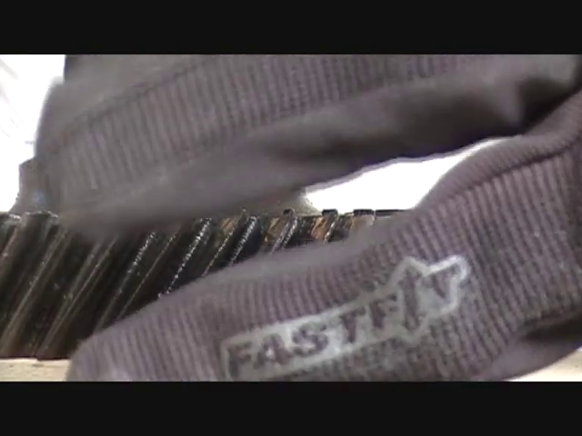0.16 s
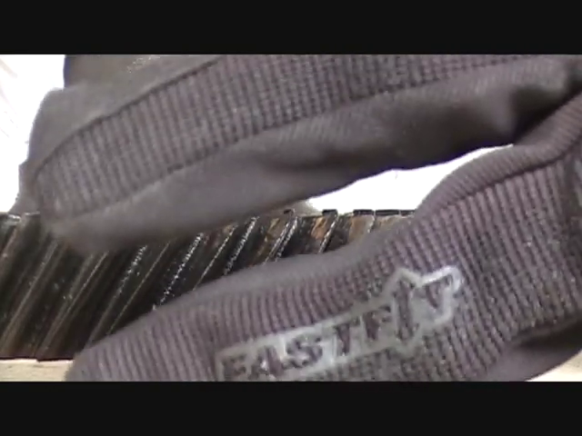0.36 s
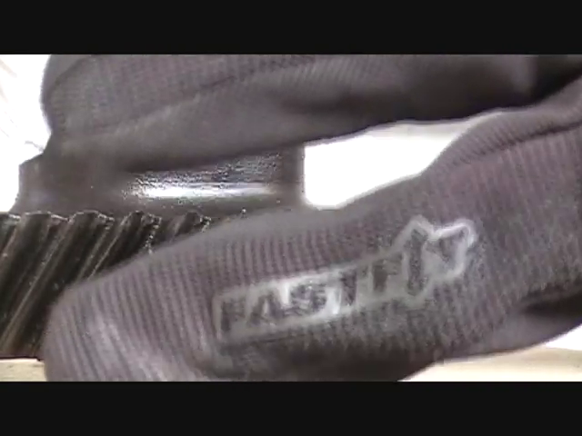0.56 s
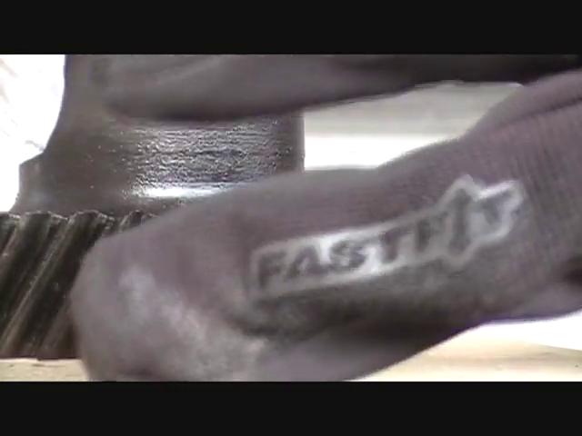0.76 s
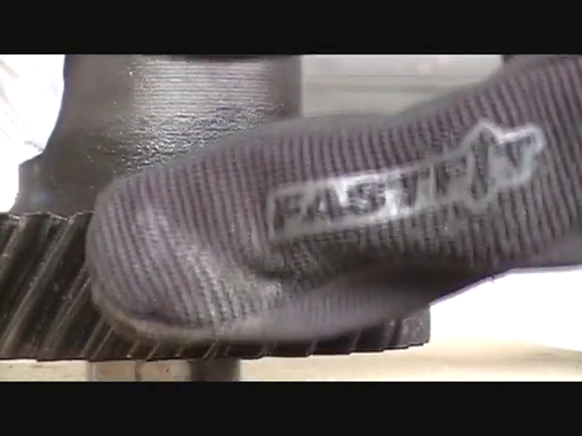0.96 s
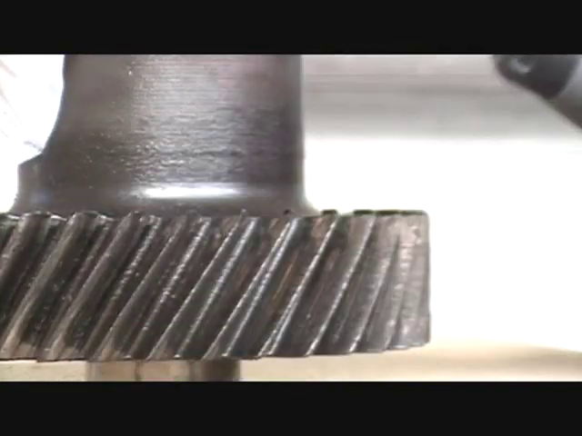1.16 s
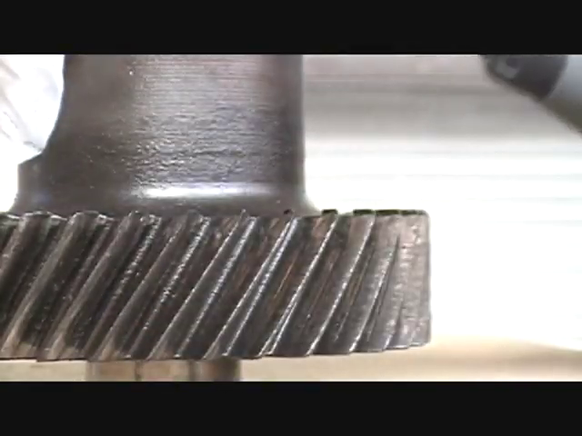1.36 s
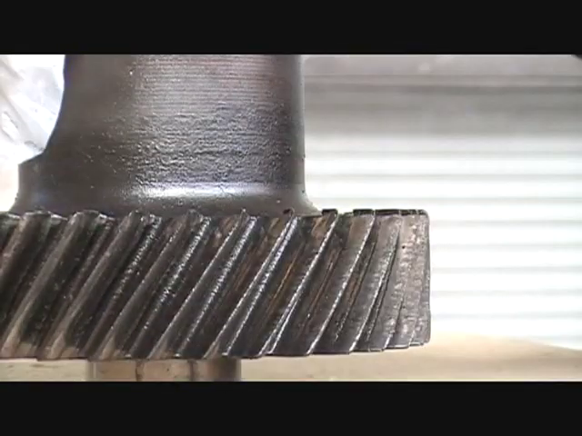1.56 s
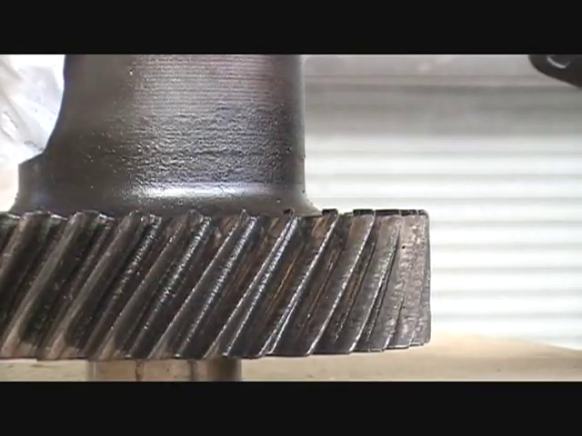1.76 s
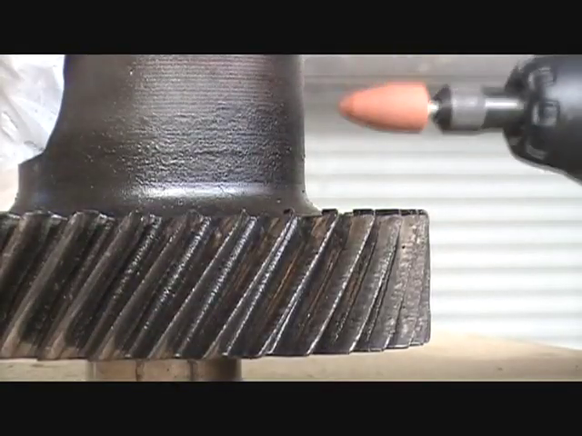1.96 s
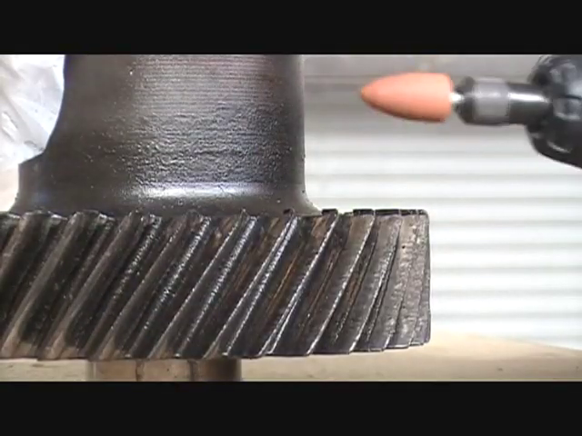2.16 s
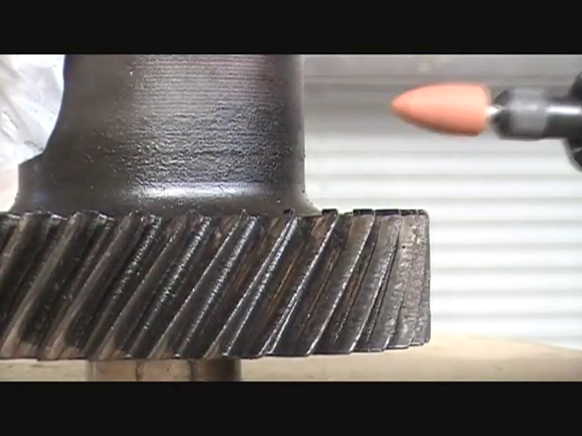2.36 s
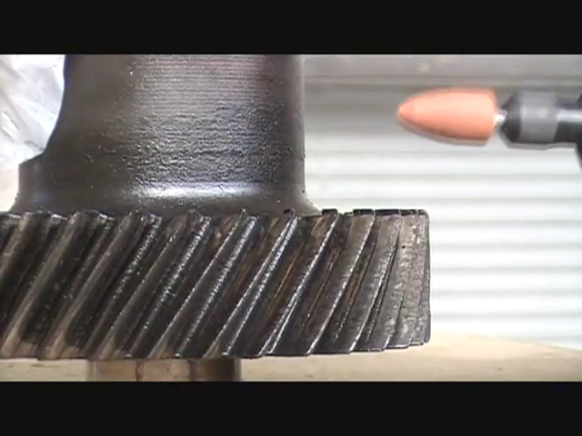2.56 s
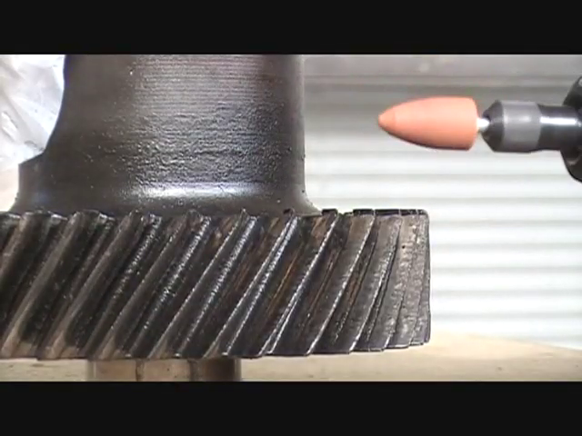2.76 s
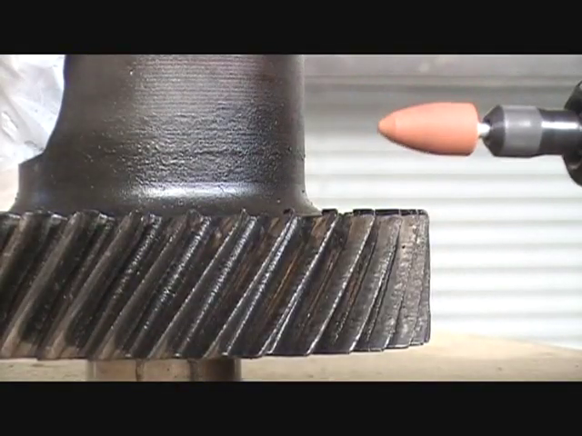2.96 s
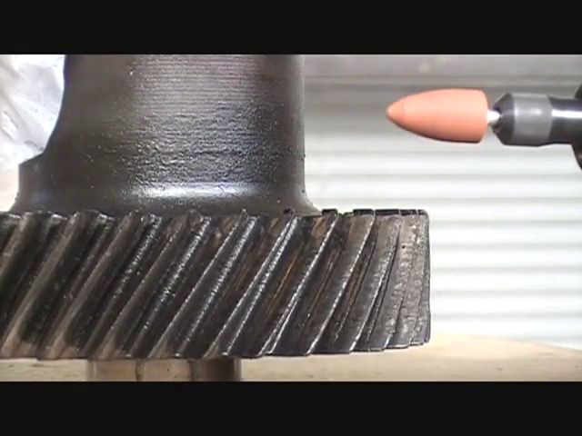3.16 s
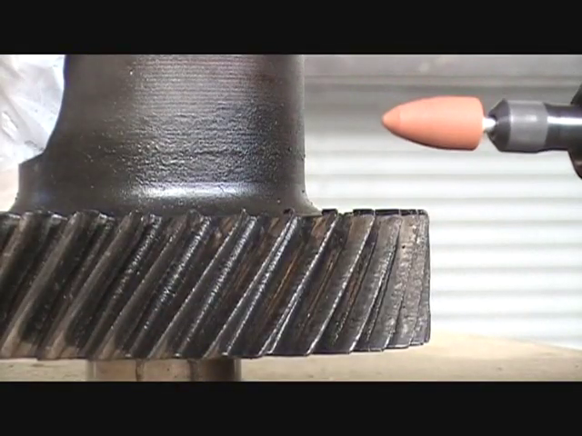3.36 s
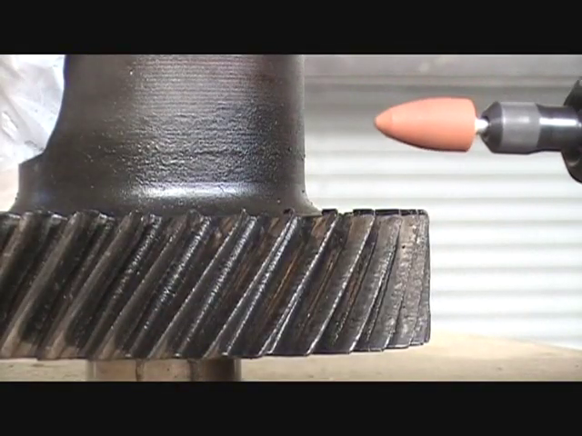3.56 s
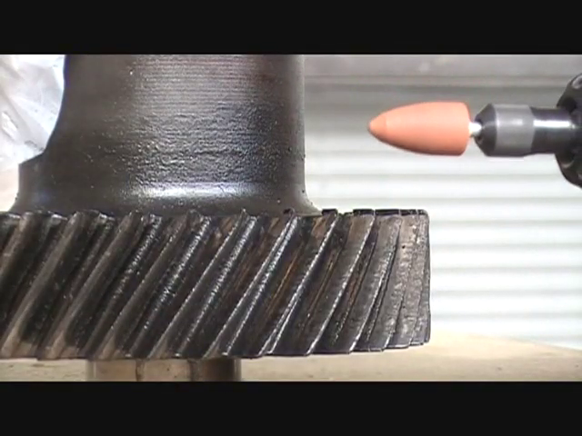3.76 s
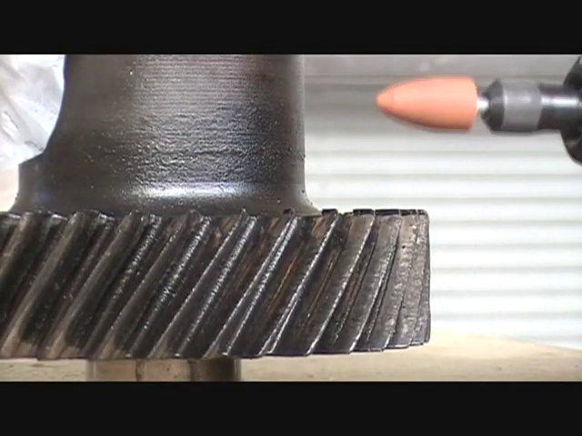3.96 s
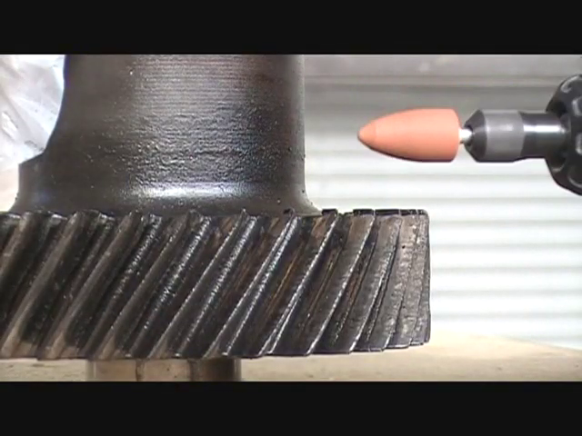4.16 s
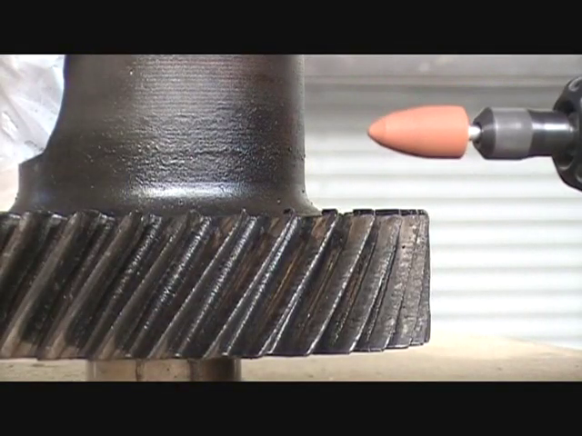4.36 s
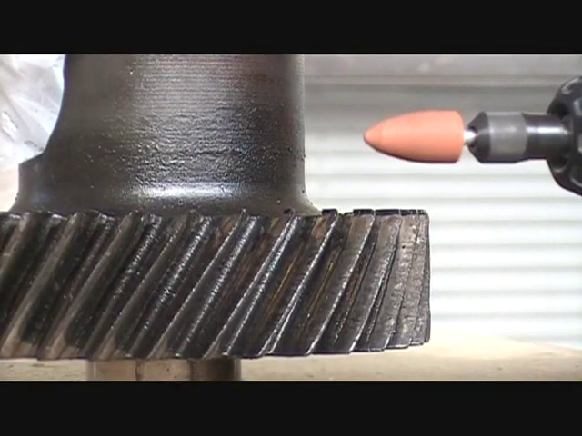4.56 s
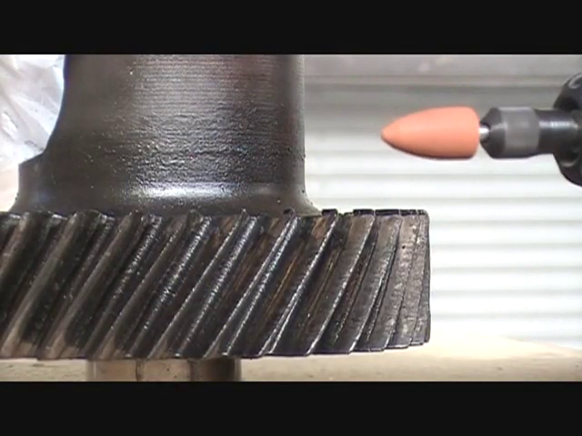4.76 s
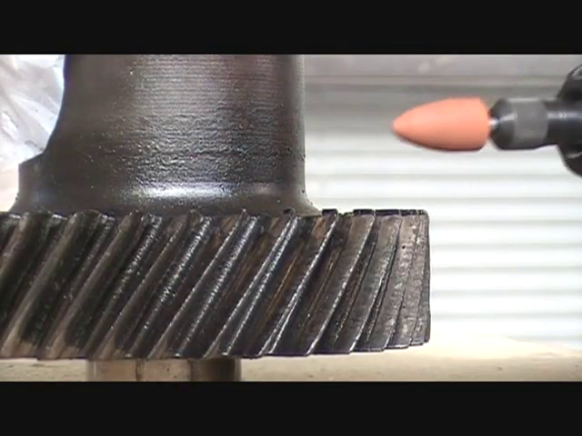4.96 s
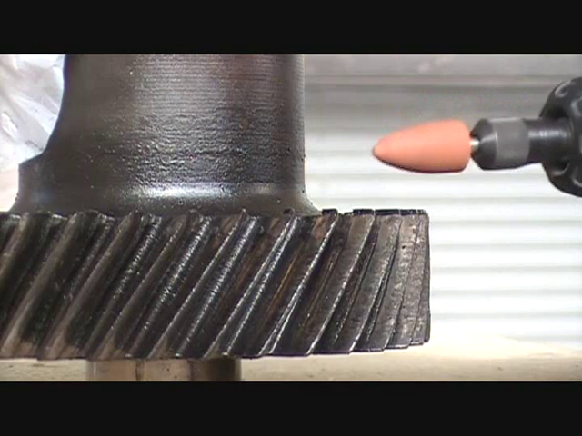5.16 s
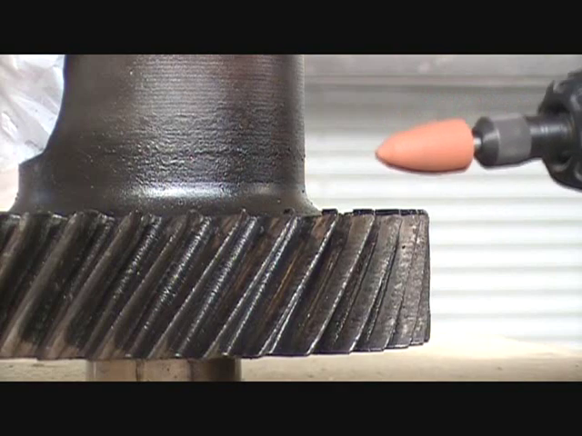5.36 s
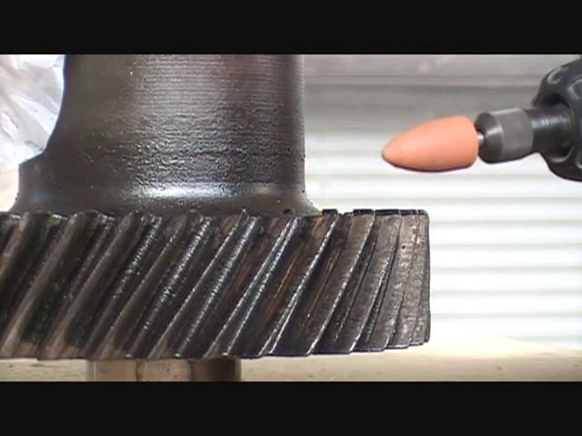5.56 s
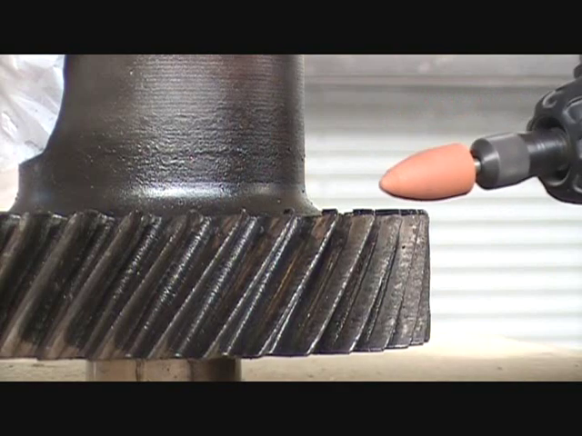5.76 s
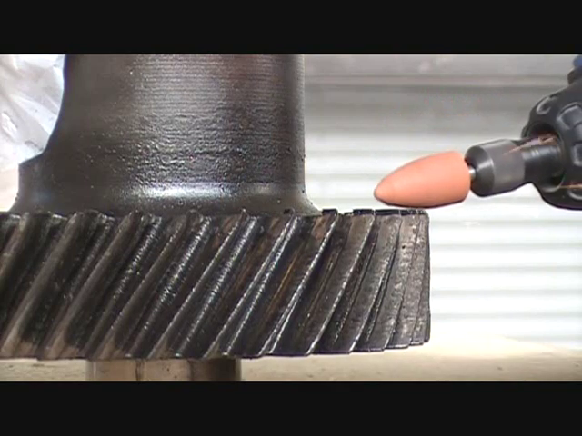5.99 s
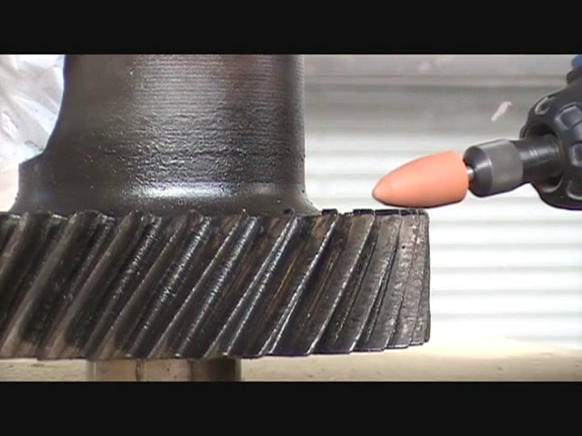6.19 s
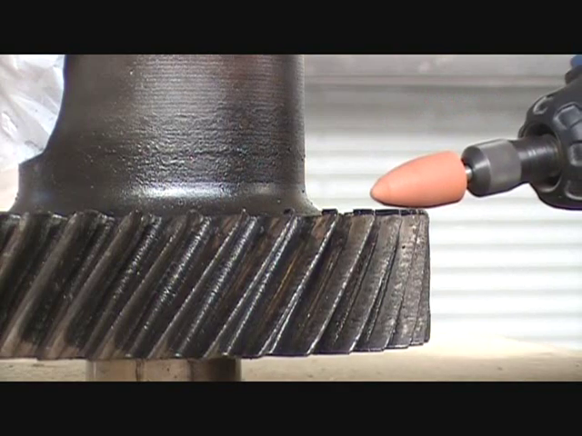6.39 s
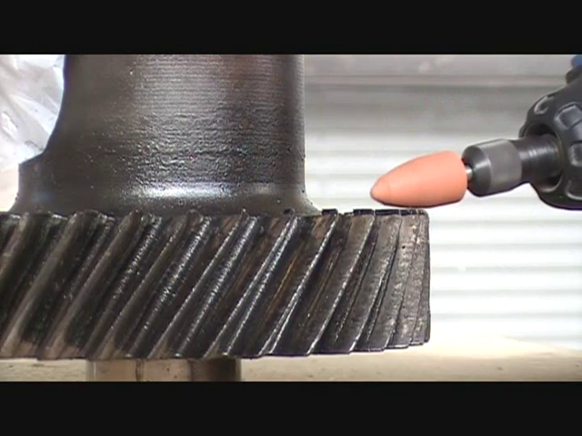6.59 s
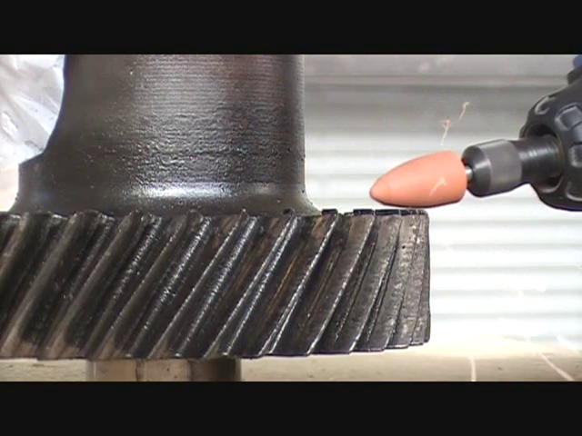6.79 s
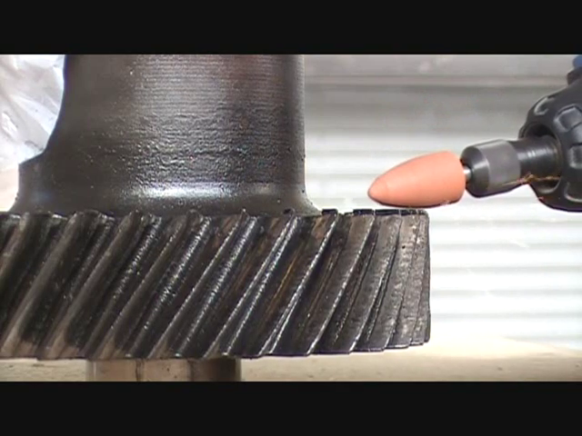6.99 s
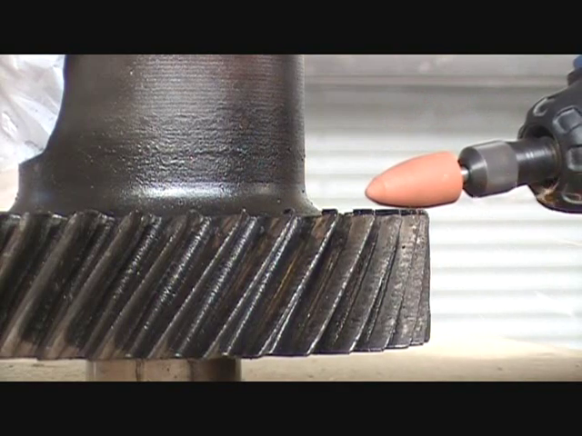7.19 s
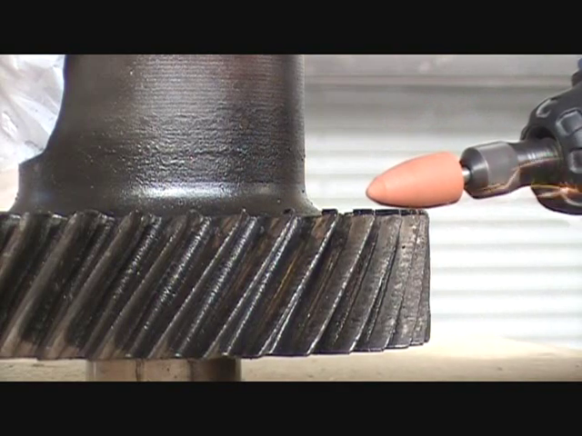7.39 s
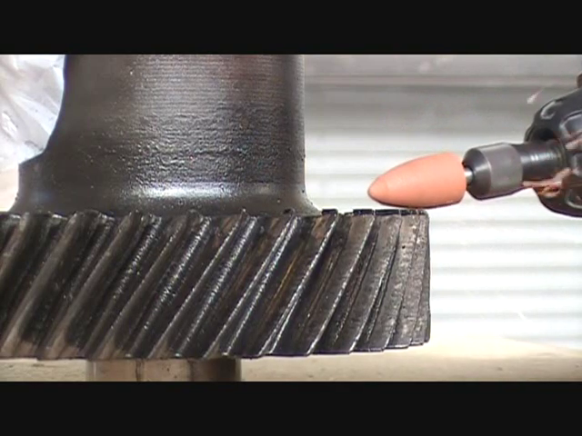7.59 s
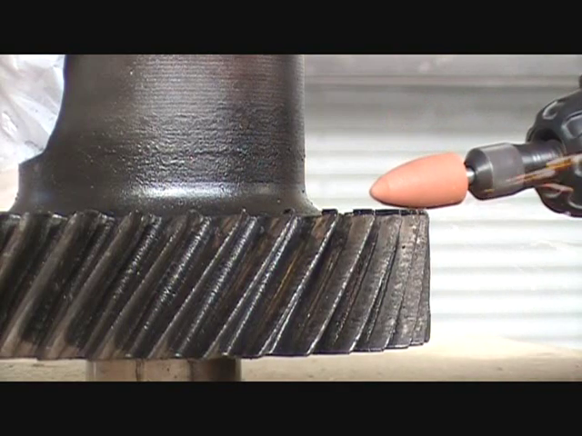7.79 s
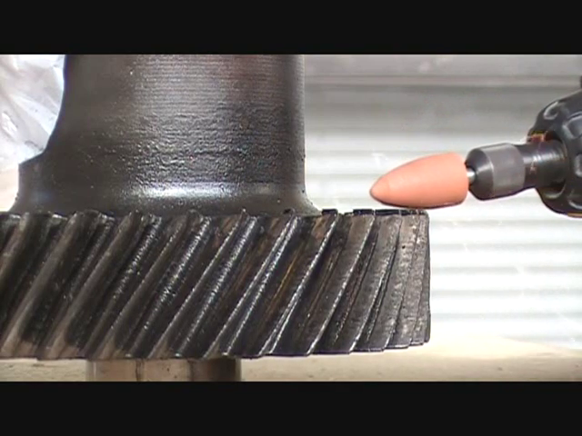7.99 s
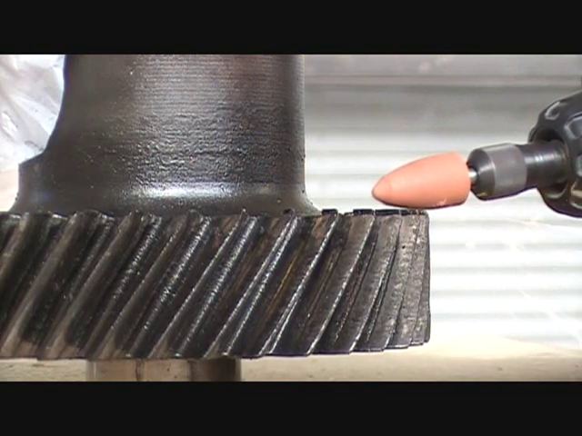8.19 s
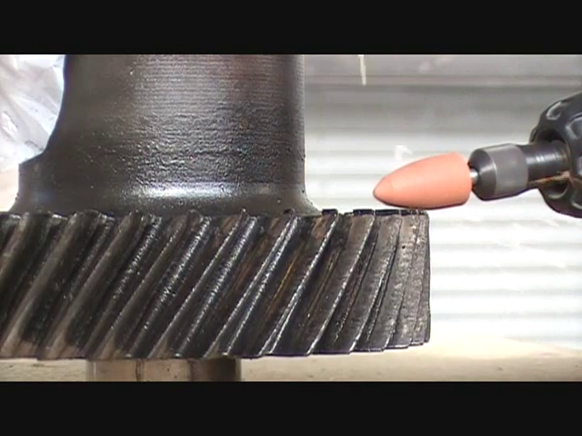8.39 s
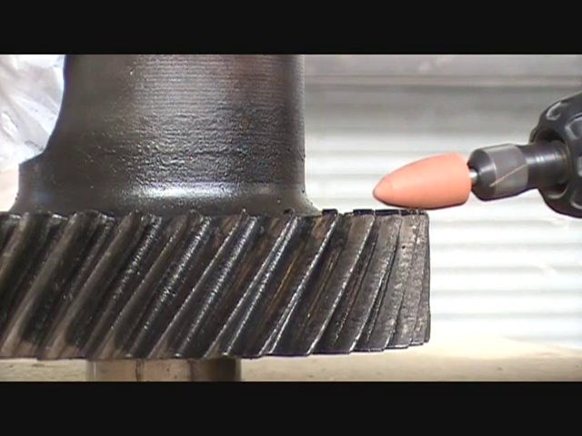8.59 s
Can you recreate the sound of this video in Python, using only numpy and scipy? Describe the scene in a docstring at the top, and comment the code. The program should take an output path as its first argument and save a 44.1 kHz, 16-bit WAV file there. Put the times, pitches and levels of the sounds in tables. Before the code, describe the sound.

After quiet workshop hum and faint chirps, a small rotary tool spins up close by, rushing with air, then grinds gritty steel teeth.

```python
"""A rotary tool, held close to the microphone, is switched on and spins up to about 30000 rpm.
Its shaft harmonics whine and its fan rushes, pulsed by the mains; its exhaust buffets the microphone.
From 6 s its stone touches the teeth of a steel gear: it strikes once a turn, grit scrapes,
the gear rings and squeals, and the motor slows a little.
Around it lies a humming workshop, with faint high chirps before and just as the motor starts."""
import sys
import numpy as np
from scipy import signal
from scipy.fft import rfft, irfft
from scipy.io import wavfile
from scipy.ndimage import uniform_filter1d

SR = 44100
rng = np.random.default_rng(int(sys.argv[2]) if len(sys.argv) > 2 else 0)


def int16_out(signal):
    """Quantize to a 16-bit WAV file."""
    q = np.round(np.clip(np.atleast_2d(signal).T, -1, 1) * 32767)
    wavfile.write(sys.argv[1], SR, q.astype(np.int16))


N = 381024
TIME = np.arange(N) / SR
MAINS_HZ = 120  # rate of the mains half-waves that pulse the motor
TOP_HZ = 15200  # upper limit of the recorded band

# spectrum of the workshop noise: (frequency [Hz], relative level [dB])
WORKSHOP_COLOUR = [(20, -34), (60, -15), (100, -11), (190, -11.5), (280, -8), (480, -10), (700, -12.5),
                   (950, -12), (1700, -12), (2500, -14.5), (4500, -16), (9150, -26), (13900, -50),
                   (15000, -65)]
# hum of the workshop before the motor runs: (frequency [Hz], level [dB])
WORKSHOP_HUM = [(57.5, -46), (118.4, -50), (274.5, -57.5)]
# the background sinks once the motor runs: (time [s], level [dB])
WORKSHOP_LEVEL = [(0, -34.5), (1.35, -33.5), (1.9, -44), (2.8, -45.5), (5, -45.5), (8.64, -47)]
# a low hum that swells near the gear: (time [s], hold [s], level [dB])
HUM_SWELLS = [(5.1, 0.36, -50), (5.75, .35, -48.5)]
# the two capsules differ most near their own resonance: (frequency [Hz], side gain [dB])
CAPSULE_DIFFERENCE = [(200, -5.5), (600, -2), (2400, -1.5), (5000, -0.5), (6500, 0.5), (8500, 6.5),
                      (11000, 14.5), (14000, 2)]
# faint high chirps: (time [s], frequency [Hz], width [Hz], length [s], level [dB])
CHIRPS = [(0.026, 4200, 900, .1, -39), (.26, 4150, 600, .08, -40), (.54, 3850, 450, .07, -41),
          (0.618, 3470, 280, 0.088, -34), (0.673, 3100, 450, .08, -33.5), (0.8, 3550, 240, .05, -32),
          (0.834, 3960, 450, 0.049, -34), (.86, 3160, 450, .07, -35), (0.99, 4400, 600, .08, -35.5),
          (1.013, 3650, 550, .07, -38), (1.153, 3940, 1100, 0.075, -33), (1.265, 3980, 550, 0.12, -36.5)]

# spectrum of the gusts' rumble: (frequency [Hz], relative level [dB])
DRAUGHT_COLOUR = [(20, -20), (45, -4), (120, -1.5), (220, -7), (400, -16), (900, -40)]
# gusts of exhaust on the microphone, over one long weak one: (time [s], hold [s], level [dB])
GUSTS = [(3.335, .005, -41), (3.4, 1.3, -50), (3.485, .01, -42), (3.64, .03, -40), (3.79, .04, -41),
         (3.878, .02, -35), (4.05, 0.055, -43), (4.25, 0.084, -43.5), (4.41, .02, -40), (4.686, .01, -45)]
GUST_ATTACK_S, GUST_RELEASE_S = .035, 0.057

# a short dull scuff, and its spectrum: (frequency [Hz], relative level [dB])
SCUFF_S, SCUFF_HOLD_S, SCUFF_DB = 8.515, 0.037, -23.5
SCUFF_COLOUR = [(60, -24), (350, -0.5), (900, 0), (2000, -2), (4000, -8), (12000, -37)]
# sharp clicks of the switch and first sparks at the brushes: (time [s], relative level [dB])
CLICKS = [(1.1796, -12), (1.2327, -14), (1.3355, -11.5), (1.341, -8), (1.360, -12), (1.375, -13),
          (1.391, -15)]
# spectrum of the clicks: (frequency [Hz], relative level [dB])
CLICK_COLOUR = [(300, -31), (1500, -6), (3500, -5), (5200, -5), (7500, 1.5), (10000, -13), (15000, -38)]

# modes of the steel gear: (frequency [Hz], time to fall 60 dB [s], relative level [dB])
GEAR_MODES = [(1626, 0.17, -4.5), (3070, .15, -4), (3606, 0.39, 5), (3810, .15, 8), (4600, 0.08, -8),
              (5370, .1, -11), (5500, .25, -6), (6950, .08, -6), (8640, 0.73, 2), (10300, .08, -4),
              (11700, .25, -6), (13507, .3, -19)]
# spectra of the stone's knock and of its scrape: (frequency [Hz], relative level [dB])
KNOCK_COLOUR = [(40, -59), (400, -22.5), (1300, -17.5), (1950, -3.5), (2450, -19.5), (3000, 2.0),
                (3700, -5.0), (5200, 0), (6200, -16.0), (7300, -2.5), (9000, -16), (11000, -18), (15000, -53)]
SCRAPE_COLOUR = [(40, -54), (400, -14.5), (1700, -3), (2400, -26), (3500, 0), (7000, -1),
                 (10000, -9), (14000, -34)]
# the stone rests on the teeth from this moment, with this level and bounce (0-1)
TOUCH_S, TOUCH_DB, TOUCH_BOUNCE = 6.03, -32, .35
# pushes of the hand: (time [s], hold [s], level [dB], bounce on every second turn [0-1])
PUSHES = [(6.05, .05, -30, 0.5), (6.874, 0.15, -26.5, .5), (7.142, 0.028, -22.5, 0),
          (7.36, 0.043, -25.5, .1), (7.7, 0.26, -27.5, .1), (8.207, .03, -25.5, .7),
          (8.38, 0.14, -28.5, .45)]
PUSH_ATTACK_S, PUSH_RELEASE_S = 0.086, 0.16
TOOTH_HZ, RIM_HZ, FACE_HZ, EDGE_HZ = 13307, 3648, 8627, 11650
# modes of the gear that squeal under the stone: (time [s], hold [s], frequency [Hz], level [dB])
SQUEALS = [(6.06, .2, TOOTH_HZ, -35), (6.3, .38, TOOTH_HZ, -32.5), (6.98, 0.23, FACE_HZ, -33),
           (7.158, .05, TOOTH_HZ, -26.5), (7.97, .22, TOOTH_HZ, -39), (8.14, .06, RIM_HZ, -29.5),
           (8.15, .2, FACE_HZ, -37), (8.26, .13, EDGE_HZ, -41), (8.35, .08, TOOTH_HZ, -33),
           (8.6, .04, TOOTH_HZ, -33)]
SQUEAL_ATTACK_S, SQUEAL_RELEASE_S = 0.05, 0.25

# how the hand holds the tool: (time [s], pose [0 back, 1 level, 2 tilted, 3 pressed on the gear])
POSE = [(1.8, 1), (2.05, 0), (2.35, 0), (2.8, 1), (4.2, 1), (5.05, 2), (5.9, 2), (6.55, 2.5), (7.0, 3)]
# reaching the microphone in each pose, back to pressed: (whine [dB], rush of the vents [dB], hiss [dB])
POSE_LEVELS = [(-19.5, -27, -22.5), (-19, -27, -23), (-19.5, -29.5, -22), (-22, -32, -24)]
# the hand sways the tool nearer to the microphone and away: (time [s], level [dB])
NEARNESS = [(1.7, 0), (2.3, 0.4), (2.9, 0), (3.15, -1.3), (3.6, 0.5), (3.95, -0.8), (4.27, 1.1),
            (4.6, 0.44), (5.8, 0.45), (6.3, -.5), (6.65, 0.5), (7.08, -1.1), (7.8, 0), (8.6, 0.5)]
# the motor nears its free speed [turns/s] in a quick and a slow stage
START_S, FREE_HZ, QUICK_SHARE, QUICK_S, SLOW_S = 1.3526, 504.6, .4935, .0966, .37
# lost to drag and to the load on the stone: (time [s], speed loss [turns/s])
SPEED_LOSS = [(2.9, 0), (3.7, 3.3), (4.0, 3.7), (4.4, 5.3), (5.3, 5.4), (6.7, 8.8), (7.25, 12.6), (8.6, 21)]
STRAIN_SLIP = 0.31  # this share below its free speed the motor draws its full starting current
PULSE_IDLE, PULSE_STRAIN = 0.21, 0.38  # depth of the mains pulsing, and what full current adds

# spectrum of the cooling air: (frequency [Hz], relative level [dB])
AIR_COLOUR = [(100, -25.5), (300, -16), (650, -13), (850, -6.5), (1150, -2), (1750, 1), (2400, -5.5),
              (4000, -5.5), (5500, -1), (7300, 0.5), (9300, -6.5), (11000, -14), (13500, -18.5),
              (15000, -35.5)]
HISS_FLICKER_DB = .6
AIR_FULL_HZ, HISS_FULL_HZ = 110, 296  # turns/s at which the tool's fade-in and the hiss are complete
COMMUTATOR_BARS, FAN_BLADES = 8, 18
# housing resonances that the commutator tones sweep through: (frequency [Hz], width [Hz], level [dB])
HOUSING = [(1620, 240, -20), (2660, 550, -18), (3136, 260, -19.5), (3550, 160, -24), (4380, 360, -21),
           (5900, 650, -25.5)]
# the commutator tones grow with this power of the speed, up to this speed [turns/s]
BRUSH_FULL_HZ, BRUSH_POWER = 195, 4

# balance of the shaft harmonics in each pose: (multiple of shaft speed, relative level [dB])
HARMONICS_BACK = [(1, 6.5), (2, -7), (3, -3), (4, -3.5), (5, -5), (6, 0), (7, 2), (8, -14), (9, -1),
                  (10, -6), (11, -14), (12, -12), (13, -5), (14, -5), (15, -11), (16, -7), (17, -16),
                  (18, 2), (19, -14), (20, -16)]
HARMONICS_LEVEL = [(1, -2.5), (2, -13), (3, -5), (4, -10.5), (5, -2.5), (6, -7.5), (7, -9), (8, 0), (9, -7),
                   (10, -14.5), (11, -22), (12, -8), (13, -18), (14, -8), (15, -11), (16, -7.5), (17, -25),
                   (18, -5), (19, -30), (20, -30), (21, -24), (22, -28), (23, -24), (24, -26)]
HARMONICS_TILTED = [(1, 0.3), (2, -1), (3, -1), (4, -4.5), (5, -7), (6, -13), (7, -10), (8, -5.5), (9, -10),
                    (10, -4.5), (11, -6.5), (12, -21), (13, -0.5), (14, -17), (15, -1.5), (16, -7),
                    (17, -9.5), (18, -1.5), (19, -9), (20, -18), (21, -20), (22, -37), (23, -26), (24, -43),
                    (25, -31), (26, -40)]
HARMONICS_PRESSED = [(1, 2), (2, -3), (3, -7), (4, -2.5), (5, -6), (6, -6), (7, -4), (8, -2.5), (9, -13),
                     (10, -2.5), (11, -3), (12, -12), (13, -8), (14, -1.5), (15, -2.5), (16, -6), (17, -15),
                     (18, -1), (19, -10), (20, -19)]
# harmonics that sing out for a moment as the tool turns or finds a tooth:
# (start [s], end [s], multiple of shaft speed, least level [dB])
SINGING = [(1.85, 2.2, 5, -31.5), (2.1, 2.702, 2, -33.5), (2.15, 2.55, 16, -26.5), (2.257, 2.45, 10, -30),
           (2.68, 3.15, 9, -28.5), (4.15, 4.62, 8, -25), (4.2, 4.6, 3, -28.5), (4.3, 4.82, 16, -30),
           (4.3, 5.0, 10, -31), (6.02, 6.42, 9, -31), (6.3, 6.9, 2, -29.5), (6.6, 7.08, 9, -28),
           (6.82, 7.45, 6, -28.5), (7.35, 7.92, 4, -29.5), (7.25, 7.85, 9, -30.5), (7.63, 7.97, 7, -28),
           (8.15, 8.6, 2, -33)]
# the fan tone as it sweeps through the resonance of the vents: (frequency [Hz], least level [dB])
VENT_RESONANCE = [(2500, -48), (5000, -40), (5350, -27), (6000, -31), (6550, -31), (6950, -20), (7300, -19),
                  (8400, -22), (8750, -35)]
WHINE_POWER = 3.66  # the whine grows with this power of the speed


def undb(db):
    """Decibels to gain."""
    return 10 ** (np.asarray(db) / 20)


def unit(x):
    """Scale to rms 1."""
    return x / np.sqrt(np.mean(x ** 2) + 1e-20)


def curves(table):
    """Each column of a table, joined by straight lines in time."""
    s, *columns = np.transpose(table)
    return [np.interp(TIME, s, column) for column in columns]


def colour(x, points):
    """Causal minimum-phase filter with a (Hz, dB) spectrum, made by folding the cepstrum."""
    hz, db = np.transpose(points)
    f = np.fft.rfftfreq(N, 1 / SR)
    gain = undb(np.interp(np.log(f + 1), np.log(hz), db))
    cepstrum = irfft(np.log(gain), N)
    cepstrum[1:N // 2] *= 2
    cepstrum[N // 2 + 1:] = 0
    return irfft(rfft(x) * np.exp(rfft(cepstrum)), N)


def noise():
    """White noise."""
    return rng.standard_normal(N)


def walk(rate):
    """Smooth random wander of rms 1, with about this many fresh values a second."""
    k = max(int(SR / rate), 2)
    values = rng.standard_normal(N // k + 2)
    path = np.interp(np.arange(N) / k, np.arange(N // k + 2), values)
    return unit(uniform_filter1d(path, k // 2 + 1))


def ring(x, hz, t60):
    """One decaying mode, as a complex one-pole resonator."""
    pole = np.exp((2j * np.pi * hz - np.log(1000) / max(t60, .001)) / SR)
    return signal.lfilter([1], [1, -pole], x).imag


def stereo(mid, side):
    """Mid and side to left and right."""
    return np.array([mid + side, mid - side])


def envelope(s, hold_s, attack_s, release_s):
    """Rises to 1 at time s, holds, then dies away."""
    rise = np.clip(1 + (TIME - s) / max(attack_s, .001), 0, 1)
    return rise ** 2 * np.exp(-np.maximum(TIME - s - hold_s, 0) / max(release_s, .001))


def posed(values):
    """One value for each pose, blended as the hand moves."""
    return np.interp(curves(POSE)[0], np.arange(len(values)), values)


def workshop(side_db=-11, hum_side=0.083):
    """Room noise and wavering hum around the microphone, with hum swelling near the gear."""
    level_db = curves(WORKSHOP_LEVEL)[0]
    hum = 0
    for hz, db in WORKSHOP_HUM:
        level = undb(db + 0.89 * walk(4))
        hum = hum + level * np.sin(2 * np.pi * hz * TIME + 0.35 * walk(2.85))
    swells = sum(undb(db) * envelope(s, hold_s, attack_s=0.11, release_s=.06)
                 for s, hold_s, db in HUM_SWELLS)
    swelling_hum = swells * np.sin(2 * np.pi * MAINS_HZ * TIME + walk(9.7))
    hum = hum * undb(level_db - level_db[0]) + swelling_hum
    mid, side = (unit(colour(noise(), WORKSHOP_COLOUR)) for _ in range(2))
    room = stereo(mid, undb(side_db) * colour(side, CAPSULE_DIFFERENCE)) * undb(level_db)
    return room + stereo(hum, hum_side * hum)


def chirps(tail_s=0.041):
    """Narrow, blurred bands of noise that rise quickly and trail off."""
    out = np.zeros(N)
    t = TIME[:2 * SR]
    for s, hz, width_hz, length, db in CHIRPS:
        edges = [hz - width_hz / 2, hz + width_hz / 2]
        band = signal.butter(2, edges, "band", fs=SR, output="sos")
        rise = np.clip((t - s) / 0.012, 0, 1)
        fall = np.exp(-np.maximum(t - s - 0.57 * length, 0) / tail_s)
        tone = unit(signal.sosfilt(band, rng.standard_normal(len(t))))
        out[:len(t)] += undb(db) * rise * fall * tone
    return out


def reflections(x, t60=0.074, wet_db=-16):
    """Bench and walls return a short wash that widens the sound, most of all in the treble."""
    t = TIME[:SR // 4]
    response = rng.standard_normal(len(t)) * undb(-60 * t / t60) * (t > .002)
    wash = signal.fftconvolve(x, response / np.linalg.norm(response))[:N]
    return undb(wet_db) * colour(wash, CAPSULE_DIFFERENCE)


def draught(side_db=10, eddy_db=-50):
    """The tool's exhaust buffets the microphone ports, mostly pushing them against each other."""
    mid, side = (unit(colour(noise(), DRAUGHT_COLOUR) * undb(2 * walk(30))) for _ in range(2))
    gusts = sum(undb(db) * envelope(s, hold_s, GUST_ATTACK_S, GUST_RELEASE_S) for s, hold_s, db in GUSTS)
    # weak eddies reach it first, as the tool comes near
    eddies = undb(eddy_db) * np.interp(TIME, [1.6, 2.0, 3.2, 4.9], [0, 1, 1, 0])
    return stereo(mid * gusts, side * (undb(side_db) * gusts + eddies))


def scuff(attack_s=0.064, release_s=.045):
    """A brief, grainy, dull rub: noise with a fast random level."""
    grains = noise() * undb(2.6 * walk(300))
    rub = unit(colour(grains, SCUFF_COLOUR))
    return undb(SCUFF_DB) * envelope(SCUFF_S, SCUFF_HOLD_S, attack_s, release_s) * rub


def clicks(decay_s=0.0017):
    """Short cracks in the plastic housing: sudden bursts of noise that die away exponentially."""
    push = sum(undb(db) * (TIME >= s) * np.exp(-np.abs(TIME - s) / decay_s) for s, db in CLICKS)
    return 0.5 * push * unit(colour(noise(), CLICK_COLOUR))


def contact():
    """Force and bounce of the stone: a light steady touch with pushes on top."""
    force = undb(TOUCH_DB) * envelope(TOUCH_S, N / SR, PUSH_ATTACK_S, PUSH_RELEASE_S)
    bounce = np.full(N, TOUCH_BOUNCE)
    for s, hold_s, db, push_bounce in PUSHES:
        push = envelope(s, hold_s, PUSH_ATTACK_S, PUSH_RELEASE_S)
        force = np.maximum(force, undb(db) * push)
        bounce = bounce + push * (push_bounce - bounce)
    return force, bounce


def squeals(flutter_db=1.2):
    """Friction catches a mode of the gear, holds it and lets it ring out."""
    out = 0
    for mode_hz in (TOOTH_HZ, RIM_HZ, FACE_HZ, EDGE_HZ):
        catches = [undb(db) * envelope(s, hold_s, SQUEAL_ATTACK_S, SQUEAL_RELEASE_S)
                   for s, hold_s, hz, db in SQUEALS if hz == mode_hz]
        gain = np.max(catches, axis=0) * undb(flutter_db * walk(60))
        out = out + gain * np.sin(2 * np.pi * mode_hz * TIME + .4 * walk(40))
    return np.sqrt(2) * out


def grinding(angle, strike_db=1.2, grit_db=-5.5, ring_db=-4.6, scatter_db=2.2, jitter_s=.00002):
    """The stone's high spot strikes once a turn and drags grit over the edge, which rings the gear."""
    force, bounce = contact()
    # the point of contact creeps round the stone, so its tones waver and trade places
    turns = angle / (2 * np.pi) + .035 * walk(9)
    when = np.interp(np.arange(1, int(turns[-1])), turns, np.arange(N))
    timing, strength = rng.standard_normal((len(when), 2)).T
    when = np.clip(when + jitter_s * SR * timing, 10, N - 10)
    at = when.astype(int)
    # where the stone bounces, a strong strike alternates with a weak one
    alternation = 1 + np.clip(bounce[at], 0, 1) * (-1) ** np.arange(len(at))
    size = undb(scatter_db * np.clip(strength, -2, 2)) * alternation
    strikes = np.zeros(N)
    for tap in range(-6, 8):  # sinc taps place each strike between samples
        np.add.at(strikes, at + tap, size * np.sinc(at + tap - when))
    drag = signal.lfilter([1], [1, -np.exp(-1 / (0.0008 * SR))], strikes)  # 0.8 ms decay
    grit = unit(drag * noise())
    knock = unit(colour(strikes, KNOCK_COLOUR))
    scrape = unit(colour(grit, SCRAPE_COLOUR))
    body = sum(undb(db) * unit(ring(grit * force, hz, t60)) for hz, t60, db in GEAR_MODES)
    body = unit(body) * np.sqrt(np.mean(force ** 2))
    return force * (undb(strike_db) * knock + undb(grit_db) * scrape) + undb(ring_db) * body


def motor():
    """Turns per second, and strain: 1 under the full starting current, 0 at free speed."""
    t = np.maximum(TIME - START_S, 0)
    slip = QUICK_SHARE * np.exp(-t / QUICK_S) + (1 - QUICK_SHARE) * np.exp(-t / SLOW_S)
    speed = FREE_HZ * (1 - slip) - curves(SPEED_LOSS)[0]
    return speed, np.clip(slip / STRAIN_SLIP, 0, 1)


def air(angle, speed, mains, chop=0.21, mains_share=0.19):
    """Air rushes from the vents; the hiss above it is chopped by the rotor, and the mains pulses both."""
    _, rush_db, hiss_db = (posed(column) for column in np.transpose(POSE_LEVELS))
    low = signal.butter(4, 2900, fs=SR, output="sos")
    high = signal.butter(4, 2900, "high", fs=SR, output="sos")
    rush = unit(signal.sosfilt(low, colour(noise(), AIR_COLOUR)))
    rush = rush * undb(rush_db + 0.79 * walk(18))
    hiss = unit(signal.sosfilt(high, colour(noise(), AIR_COLOUR)))
    hiss = hiss * undb(hiss_db + HISS_FLICKER_DB * walk(24))
    hiss = hiss * np.minimum(speed / HISS_FULL_HZ, 1)
    return (rush + hiss * (1 + chop * np.sin(angle))) * (1 + mains_share * (mains - 1))


def commutator(angle, speed, strain, flutter_db=1.2, octave_db=1.5):
    """Brushes chatter under the starting current; their tones sweep through the housing's resonances."""
    out = 0
    for order, gain in ((COMMUTATOR_BARS, 1), (2 * COMMUTATOR_BARS, undb(octave_db))):
        power = sum(undb(db) ** 2 / (1 + (2 * (order * speed - hz) / width) ** 2) ** 1.4
                    for hz, width, db in HOUSING)
        # uneven round each turn
        chatter = 1 + strain * (.3 * walk(700) + .6 * np.sin(angle))
        level = gain * np.sqrt(power) * chatter * undb(flutter_db * walk(21.97))
        phase = order * angle + 0.74 * strain * walk(400) + rng.uniform(0, 2 * np.pi)
        out = out + level * np.sin(phase)
    growth = np.minimum(speed / BRUSH_FULL_HZ, 1) ** BRUSH_POWER
    return np.sqrt(2) * strain * growth * out


def whine(angle, speed, strain, mains, wander_db=1.36, strain_wander_db=4, fan_flutter_db=1.5,
          slow_shaft_db=-7, load_wander_db=0.5):
    """Shaft harmonics grow with speed; their balance follows the tool's pose, and the overtones wander."""
    multiples = np.arange(1, len(HARMONICS_TILTED) + 1)
    by_order = []
    for held, levels in zip((HARMONICS_BACK, HARMONICS_LEVEL, HARMONICS_TILTED, HARMONICS_PRESSED),
                            POSE_LEVELS):
        pattern = undb([dict(held).get(k, -60) for k in multiples])
        by_order.append(undb(levels[0]) * pattern / np.linalg.norm(pattern))
    gains = np.transpose(by_order)
    touching = envelope(TOUCH_S, N / SR, PUSH_ATTACK_S, PUSH_RELEASE_S)
    growth = (speed / FREE_HZ) ** WHINE_POWER
    out = 0
    for order, by_pose in zip(multiples, gains):
        gain = growth * posed(by_pose)
        for start, end, multiple, db in SINGING:
            if round(multiple) == order:
                fade = np.clip(np.minimum(TIME - start, end - TIME) / 0.14 + .5, 0, 1)
                gain = np.maximum(gain, undb(db) * fade)
        if order == 1:
            # the imbalance is a clean tone that shakes the case fully only near top speed
            shake = undb(np.interp(speed, [430, 442], [slow_shaft_db, 0]))
            out = out + gain * shake * np.sin(angle)
            continue
        if order == FAN_BLADES:
            resonance = undb(np.interp(order * speed, *np.transpose(VENT_RESONANCE)))
            gain = np.maximum(gain, resonance) * undb(fan_flutter_db * walk(22))
        else:
            spread_db = wander_db + strain_wander_db * strain + load_wander_db * touching
            gain = gain * undb(spread_db * walk(9))
        if order % COMMUTATOR_BARS == 0:
            gain = gain * mains
        sway = .1 * walk(50)  # radians
        out = out + gain * np.sin(order * angle + sway + rng.uniform(0, 2 * np.pi))
    return np.sqrt(2) * out


def scene():
    """The shaft angle drives whine, commutator, air and grinding together."""
    speed, strain = motor()
    angle = 2 * np.pi * np.cumsum(speed * (1 + .00012 * walk(18))) / SR
    depth = np.clip(PULSE_IDLE + PULSE_STRAIN * strain, 0, 1)
    # pulsing with rms 1 at any depth
    mains = (1 + depth * np.cos(2 * np.pi * MAINS_HZ * TIME + 1)) / np.sqrt(1 + depth ** 2 / 2)
    running = np.minimum(speed / AIR_FULL_HZ, 1)
    tool = whine(angle, speed, strain, mains)
    tool = tool + mains * commutator(angle, speed, strain)
    tool = tool + air(angle, speed, mains)
    near = running * undb(curves(NEARNESS)[0]) * tool
    near = near + grinding(angle) + squeals() + clicks() + chirps() + scuff()
    return stereo(near, reflections(near)) + draught() + workshop()


def record(dry, balance_db=-0.7):
    """The microphone's right side is a little louder; a steep low-pass cuts the top."""
    tilted = dry * undb(np.array([[balance_db], [-balance_db]]) / 2)
    return signal.sosfilt(signal.ellip(10, .2, 80, TOP_HZ, fs=SR, output="sos"), tilted)


dry = scene()
out = record(dry)
int16_out(out)
```